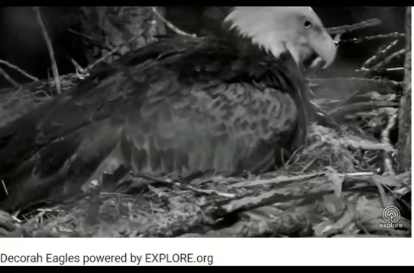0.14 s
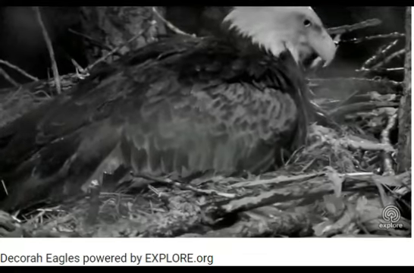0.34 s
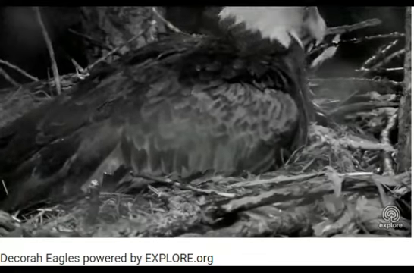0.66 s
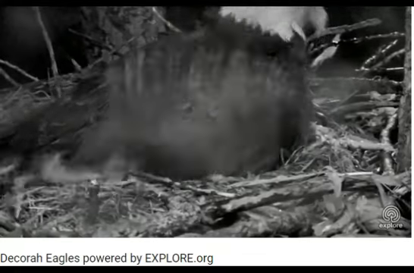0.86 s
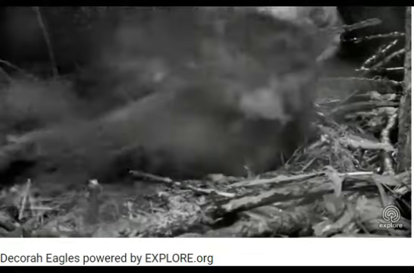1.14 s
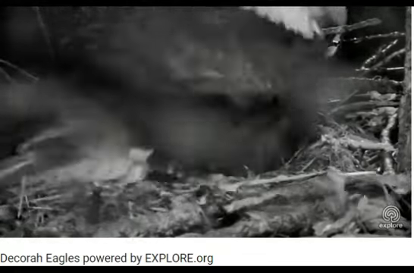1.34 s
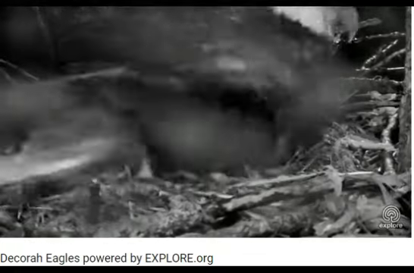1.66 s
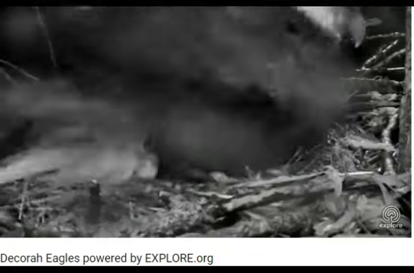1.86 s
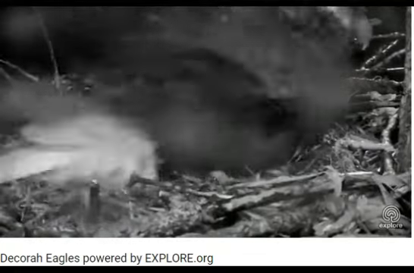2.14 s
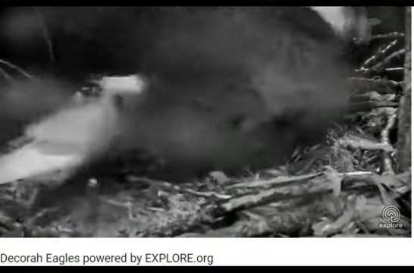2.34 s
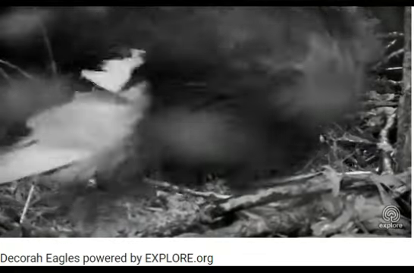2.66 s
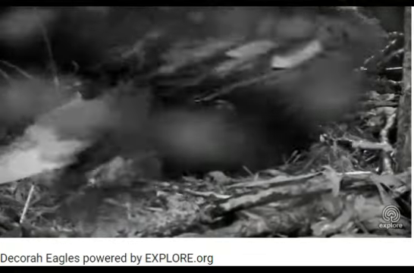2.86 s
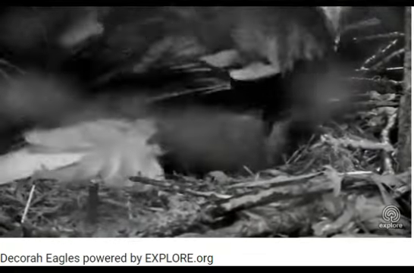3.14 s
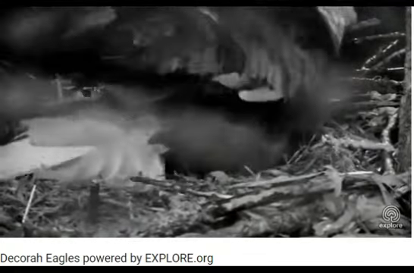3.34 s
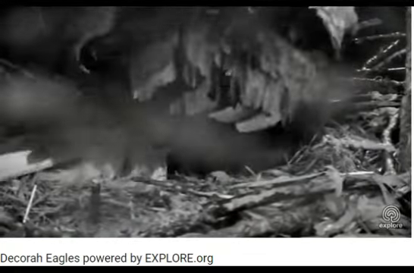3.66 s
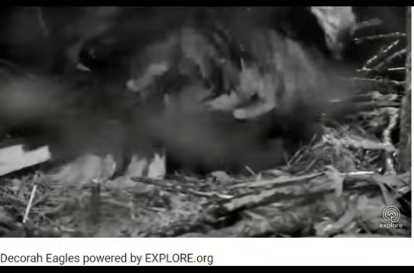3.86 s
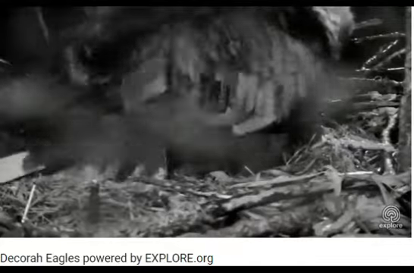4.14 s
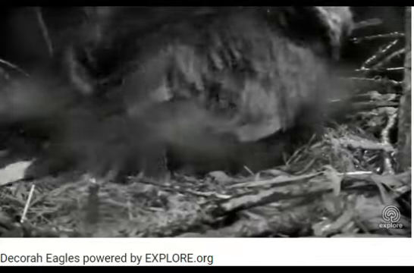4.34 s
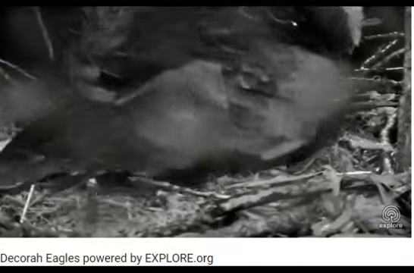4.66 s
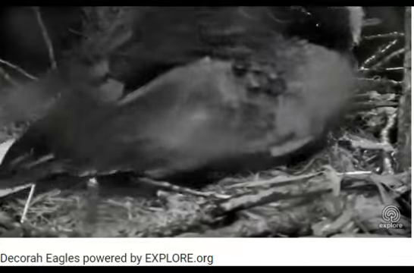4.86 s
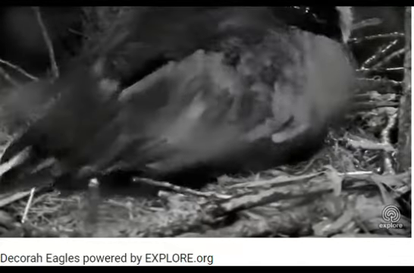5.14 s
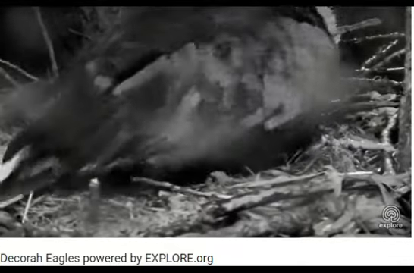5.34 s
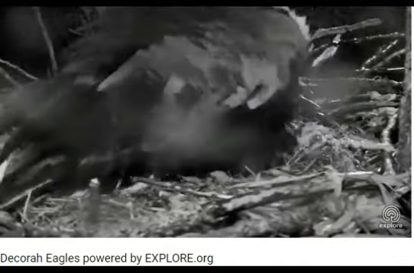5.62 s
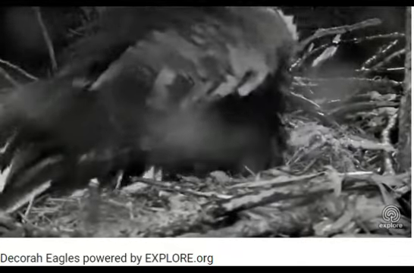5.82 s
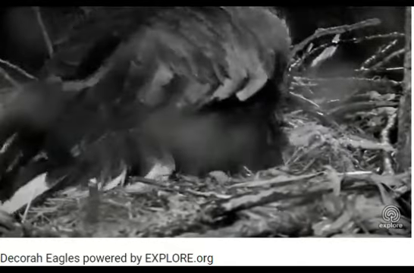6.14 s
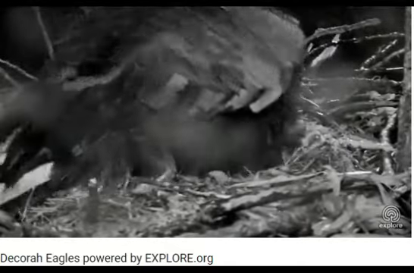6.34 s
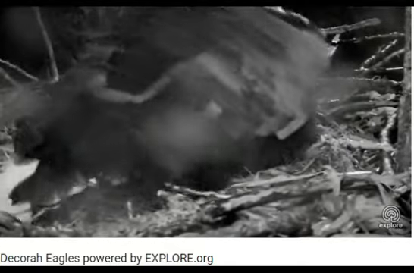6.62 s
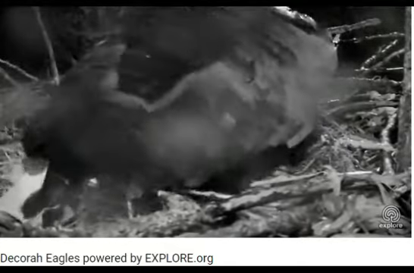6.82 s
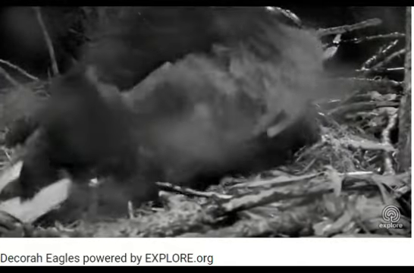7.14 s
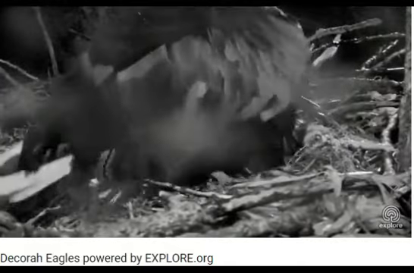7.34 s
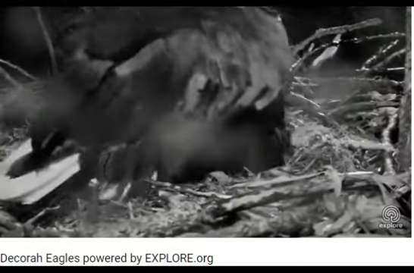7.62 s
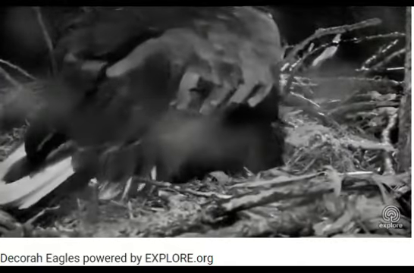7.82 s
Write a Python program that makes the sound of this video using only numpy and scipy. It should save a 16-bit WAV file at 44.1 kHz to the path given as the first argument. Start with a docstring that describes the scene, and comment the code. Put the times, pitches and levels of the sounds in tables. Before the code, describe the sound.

Rain hisses and patters throughout over a low, gently gusting wind, heard through a small outdoor microphone with a thin, telephone-like tone. Larger drops tap on its housing at about 0.5 seconds and just before 2 seconds. A distant songbird gives a few faint falling notes between 2 and 2.7 seconds. At about 2.8 seconds an eagle shakes out its feathers very close by: a rapid, fluttering swish with sharp, clattering quill clicks and dull wing thumps. This is much louder than the weather, with the hardest snap near 3.4 seconds. The shaking runs down and ends by 4.5 seconds. The rain and wind continue, slightly softer. From about 5.5 to 7.4 seconds the far songbird chirps and twitters faintly, and two more drops tap near the end.

```python
"""An eagle stands up on its stick nest and shakes out its feathers in steady rain and wind.
Its body twists about fourteen times a second: feathers rub and swish, stiff quills clatter and the wings
thump, right beside a small outdoor microphone. Raindrops tap on the microphone's housing, and a songbird
twitters far off. The sound is sampled at a telephone rate, which mirrors its treble upwards."""
import sys
import numpy as np
from scipy import signal
from scipy.fft import rfft, irfft
from scipy.io import wavfile
from scipy.ndimage import uniform_filter1d

SR = 44100
rng = np.random.default_rng(int(sys.argv[2]) if len(sys.argv) > 2 else 0)


def store_wav(level_fs):
    """Save 16-bit WAV to argv[1]."""
    pcm = np.round(np.clip(np.atleast_2d(level_fs), -1, 1) * 32767)
    wavfile.write(sys.argv[1], SR, pcm.T.astype(np.int16))


N = 352359

# how loud the weather is; the rain eases a little halfway through: t/s, rain level/dB, wind level/dB
WEATHER_LEVELS = [(0, -37.6, -42), (2.6, -38, -43), (4.0, -38, -42.5), (5.2, -39.5, -44),
                  (7.99, -40, -43.5)]
# how hard the eagle shakes; it starts quickly and slowly runs down: t/s, level/dB
SHAKE_EFFORT = [(2.72, -58), (2.85, -34.8), (3.05, -36), (3.2, -34.5), (3.5, -37), (3.85, -37),
                (4.08, -43.5), (4.16, -39), (4.45, -54)]


def gain_of(db):
    """Turns decibels into a number to multiply by."""
    return 10 ** (np.asarray(db) / 20)


def unit_level(x):
    """Scales a signal so that its average level (rms) is 1."""
    return x / np.sqrt(np.mean(x ** 2) + 1e-20)


def level_at(spectrum, hz):
    """Reads a spectrum's level at hz, with every octave equally wide."""
    known_hz, db = np.transpose(spectrum)
    return np.interp(np.log(hz + 1), np.log(known_hz + 1), db)


def follow(rows, t, column=1):
    """Reads one column of a table at the times t, along straight lines between the rows."""
    columns = np.transpose(rows)
    return np.interp(t, columns[0], columns[column])


def add(mix, start_s, sound):
    """Mixes a sound in at the given time."""
    part = mix[max(round(start_s * SR), 0):][:len(sound)]
    part += sound[:len(part)]


def colour(x, spectrum, size=2048):
    """Filters x with a spectrum; nothing rings ahead of a click, so clicks stay sharp."""
    hz = abs(np.fft.fftfreq(size, 1 / SR))
    log_gain = np.log(gain_of(np.maximum(level_at(spectrum, hz), -90)))
    taps = np.fft.ifft(np.exp(np.conj(signal.hilbert(log_gain)))).real
    return signal.oaconvolve(x, taps[:size // 2])[:N]


def ring(tones, tilt_db=0, stretch=1):
    """A ring made of a few dying tones; tilt_db brightens them, stretch raises their pitch."""
    t = np.arange(1024) / SR
    x = np.zeros(len(t))
    for hz, db, fade_s in tones:
        level = gain_of(db + tilt_db * np.log2(hz / 1000) - 60 * t / fade_s)
        x += level * np.sin(2 * np.pi * hz * stretch * t)
    return x / abs(x).max()


def clicks(per_s, spread_db):
    """Random clicks, mostly small and a few large."""
    size = gain_of(spread_db * np.minimum(rng.exponential(1, N), 4))
    return size * rng.choice([-1, 1], N) * (rng.random(N) < per_s / SR)


def rushing_air(low_hz, high_hz):
    """Steady noise between two frequencies."""
    band = signal.butter(2, [low_hz, high_hz], "band", fs=SR, output="sos")
    return unit_level(signal.sosfilt(band, rng.standard_normal(N)))


def wind_and_rain(patchy_db=1.16, gust_db=1.0, split_hz=750, size=1024):
    """Low gusty wind and the hiss of rain, each slowly changing in loudness."""
    # rain and wind, coloured by the microphone housing: f/Hz, level/dB
    weather_spectrum = [(12, -31), (20, -1), (44, -3.5), (86, -8), (174, -4), (232, -4.5), (368, -5.5),
                        (779, -12.5), (1040, -12.5), (1510, 2), (1610, 0), (1970, -10), (2300, -14.5),
                        (3060, -15), (3900, -23.5), (5070, -61), (8580, -120)]
    hop, hz = size // 4, np.fft.rfftfreq(size, 1 / SR)
    # noise is built on a grid of time (rows) and frequency (columns)
    real, imaginary, patches, gusts = rng.standard_normal((4, N // hop + 5, len(hz)))
    patches = uniform_filter1d(patches, size=10, axis=0)
    patches = unit_level(uniform_filter1d(patches, size=12, axis=1))
    gusts = unit_level(uniform_filter1d(gusts[:, :1], size=24, axis=0))
    db = level_at(weather_spectrum, hz) + patchy_db * patches - gust_db * gusts / (1 + (hz / 90) ** 2)
    grid = (real + 1j * imaginary) * gain_of(db)
    noise = signal.istft(grid.T, nperseg=size, noverlap=size - hop)[1][:N]
    spectrum, t = rfft(noise), np.arange(N) / SR
    wind_share = 1 / (1 + (np.fft.rfftfreq(N, 1 / SR) / split_hz) ** 4)
    wind = unit_level(irfft(spectrum * wind_share, N))
    rain = unit_level(irfft(spectrum * (1 - wind_share), N))
    return gain_of(follow(WEATHER_LEVELS, t, column=2)) * wind + gain_of(follow(WEATHER_LEVELS, t)) * rain


def raindrops(below_rain_db=7):
    """Nearby drops patter and make the housing ring; a few larger ones stand out."""
    # one drop heard through the housing: f/Hz, level/dB, time to fade by 60 dB/s
    housing_tones = [(1550, -5.5, 0.011), (2870, -16, 0.0033)]
    # larger drops close by: t/s, peak level/dB
    large_drops = [(0.508, -20), (.533, -25), (1.760, -23), (1.903, -23), (1.939, -24), (4.945, -26.5),
                   (7.705, -24), (7.930, -24)]
    tap = ring(housing_tones)
    patter = signal.oaconvolve(clicks(per_s=260, spread_db=2.5), tap)[:N]
    out = gain_of(follow(WEATHER_LEVELS, np.arange(N) / SR) - below_rain_db) * unit_level(patter)
    for start, db in large_drops:
        add(out, start, gain_of(db) * tap)
    return out


def bird_note(pitch, db, waver=0.013):
    """One soft-edged, slightly wavering whistle; pitch has rows of t/s, f/Hz."""
    length_s = pitch[-1][0]
    t = np.arange(0, length_s, 1 / SR)
    wobble = unit_level(uniform_filter1d(rng.standard_normal(SR // 4), size=40))[:len(t)]
    hz = follow(pitch, t) * (1 + waver * wobble)
    swell = np.sin(np.pi * (t / length_s) ** .8) ** 0.66
    return gain_of(db) * swell * np.sin(2 * np.pi * np.cumsum(hz) / SR)


def songbird(note_s=.045, fall_hz=360, twitter_per_s=16, echo_s=0.23, echo_db=-6):
    """A far songbird sings falling notes, calls, whistles and a faint twitter; the trees echo them."""
    # its usual short, husky note, sliding down: t/s, starting f/Hz, level/dB
    falling_notes = [(2.12, 2770, -42.5), (2.22, 2900, -47), (2.36, 2930, -46), (5.597, 2870, -44),
                     (5.715, 2890, -46), (6.085, 2870, -47), (6.155, 3150, -46.5), (6.996, 3130, -44)]
    # its sharp calls: t/s, level/dB
    sharp_calls = [(5.685, -44), (7.358, -41)]
    # a call sweeps up, then settles on one pitch: t/s from its start, f/Hz
    call_pitch = [(0, 2840), (.022, 4080), (.029, 3840), (.06, 3820)]
    # its thin, steady whistles: t/s, length/s, f/Hz, level/dB
    whistles = [(.14, 0.17, 3775, -51), (7.257, .075, 3980, -52.5)]
    # stretches of faint twittering: start t/s, end t/s
    twitter_spans = [(2.2, 2.7), (5.75, 7.0)]
    song = np.zeros(N)
    for start, hz, db in falling_notes:
        add(song, start, bird_note([(0, hz), (note_s, hz - fall_hz)], db, waver=0.021))
    for start, db in sharp_calls:
        add(song, start, bird_note(call_pitch, db))
    for start, length, hz, db in whistles:
        add(song, start, bird_note([(0, hz), (length, hz)], db, waver=0.0075))
    t = np.arange(SR // 2) / SR
    trees = rng.standard_normal(len(t)) * gain_of(-60 * t / echo_s)
    for start, end in twitter_spans:
        for beat in np.arange(start, end, 1 / twitter_per_s):
            first_hz, last_hz = 2944 + 280 * rng.uniform(-1.005, 1, 2)
            late_s = rng.random() / twitter_per_s
            add(song, beat + late_s, bird_note([(0, first_hz), (note_s, last_hz)], db=-52.5))
    echo = signal.oaconvolve(song, trees / np.linalg.norm(trees))[:N]
    return song + gain_of(echo_db) * echo


def shake_strength():
    """How hard the eagle shakes at each moment; zero before and after the shake."""
    t = np.arange(N) / SR
    shaking = (t > SHAKE_EFFORT[0][0]) & (t < SHAKE_EFFORT[-1][0])
    return gain_of(follow(SHAKE_EFFORT, t)) * shaking


def feathers(swish_db=7.5, way_back_db=-1.5, uneven_db=0.65, push_db=-12.5):
    """Feather strands slip over each other in tiny clicks; each twist adds a swish and a push of air."""
    # feathers rubbing: f/Hz, level/dB
    rubbing_spectrum = [(100, -23), (450, -14), (850, -11), (1200, -10), (1520, 8.5), (1800, -0.5),
                        (2250, -2), (2460, 1), (2700, -4), (2930, -0.5), (3250, -2), (3550, -2.5),
                        (3900, -12), (4500, -22.5)]
    first_twist_s, gap_s, slowing_s = 2.857, .0688, .00038  # each gap is slowing_s longer than the last
    effort, twists = shake_strength(), np.zeros(N)
    swell = signal.windows.gaussian(SR // 10, .010 * SR / np.sqrt(2))
    for k, chance in enumerate(rng.standard_normal(21)):
        middle_s = first_twist_s + k * (gap_s + slowing_s * k / 2)
        strength = gain_of(swish_db + way_back_db * (k % 2) + uneven_db * chance)
        add(twists, middle_s - .05, strength ** 2 * swell)  # the swell peaks .05 s in
    slips = unit_level(clicks(per_s=1700, spread_db=3.0))
    swish = colour(slips * effort * np.sqrt(1 + twists), rubbing_spectrum)
    swish /= np.std(colour(slips, rubbing_spectrum))
    push = rushing_air(low_hz=280, high_hz=850) * effort * np.sqrt(twists)
    return swish + gain_of(push_db) * push


def quill_click(tilt_db, stretch, contact_s=0.00014):
    """The click of a quill (a feather's stiff shaft), ringing in the microphone's housing and inlet."""
    # tones of the housing and its inlet tube: f/Hz, level/dB, time to fade by 60 dB/s
    housing_click_tones = [(520, -24, 0.0031), (1520, -5, 0.024), (2146, 0.5, 0.0061), (2525, 0.5, 0.0055),
                           (2920, 6, 0.0057), (3650, -2, 0.0027)]
    click = ring(housing_click_tones, tilt_db, stretch)
    t = np.arange(len(click)) / SR
    click *= 1 - np.exp(-(t / contact_s) ** 2)  # the contact takes a moment to build up
    return click / abs(click).max()


def small_quills(boost_db=10.5):
    """Smaller quills tick at random for as long as the eagle shakes."""
    hits = gain_of(boost_db) * shake_strength() * clicks(per_s=41, spread_db=1.5)
    return signal.oaconvolve(hits, quill_click(tilt_db=0, stretch=0.96))[:N]


def quill_snaps(detune=.02, bounces=3, gap_s=.0015, bounce_db=-9, fade_db_per_s=1500):
    """Quills snap against each other and against twigs, then chatter in quick, fading bounces."""
    # the loudest snaps: t/s, peak level/dB, brightness/(dB per octave)
    snaps = [(2.8989, -8.5, -10), (2.9091, -10.5, 0), (2.9236, -15, -2), (3.0060, -12, -8),
             (3.0717, -10.5, -9), (3.1023, -14, 0), (3.1333, -5.5, 6), (3.137, -1.5, 9), (3.1382, -1.5, 4),
             (3.197, -15, 0), (3.2721, -4, -2), (3.2854, -19, -2), (3.3505, -9, -5), (3.4135, -14, -8),
             (3.4246, 6, 3.5), (3.4780, -11.5, -14), (3.4854, -12, -12), (3.5730, -6, 4),
             (3.6917, -13.5, 1), (3.7068, -11.5, -1), (3.8715, -12.5, 4), (3.9962, -21, -12),
             (4.0080, -22, -15), (4.2178, -21.5, 3)]
    out = np.zeros(N)
    for start, db, tilt_db in snaps:
        snap = gain_of(db) * quill_click(tilt_db, stretch=1 + detune * rng.uniform(-1, 1))
        add(out, start, snap)
        delays = np.cumsum(gap_s * rng.uniform(.5, 1.5, bounces))
        signs = np.sign(rng.uniform(-1, 1, bounces))
        for delay, sign in zip(delays, signs):
            add(out, start + delay, sign * gain_of(bounce_db - fade_db_per_s * delay) * snap)
    return out


def wing_thumps(rise_s=.003):
    """The wings hit the body and squeeze out dull puffs of air."""
    # thumps on the hardest twists: t/s, level/dB
    thumps = [(3.003, -27), (3.134, -27), (3.272, -32), (3.348, -34), (3.424, -30), (3.483, -35.5),
              (3.571, -34.5)]
    t = np.arange(SR // 10) / SR
    puff = t / rise_s * np.exp(1 - t / rise_s)
    level = np.zeros(N)
    for start, db in thumps:
        add(level, start, gain_of(db) * puff)
    return level * rushing_air(low_hz=170, high_hz=1100)


def scene():
    """The weather, the shaking eagle and the far songbird, in one channel."""
    weather = wind_and_rain() + raindrops()
    eagle = feathers() + wing_thumps() + quill_snaps() + small_quills()
    return (weather + eagle + songbird())[None]


def record(dry, band_hz=3950, sampling_hz=8000, hiss_db=-69.5, ceiling=0.65, top_hz=16000):
    """Slow sampling mirrors the treble upwards; ticks and hiss join in, and loud peaks are cut flat."""
    # the converter's smoothing, which lets some mirrored treble through: f/Hz, level/dB
    smoothing = [(3200, 0), (4000, -6.5), (4500, -8.5), (5000, -12), (6000, -27.5), (7000, -48),
                 (9500, -45), (11000, -27.5), (13000, -30.5), (15000, -53)]
    # thin ticks: t/s, peak level/dB
    ticks = [(2.905, -21), (5.313, -32)]
    narrow = signal.sosfilt(signal.butter(10, band_hz, fs=SR, output="sos"), dry[0])
    phase = 2 * np.pi * sampling_hz * np.arange(N) / SR
    # copies appear on both sides of the sampling rate and of twice that rate
    mirrored = narrow * (1 + 2 * np.cos(phase) + 2 * np.cos(2 * phase))
    smooth = colour(mirrored, smoothing)
    for start, db in ticks:
        add(smooth, start, gain_of(db) * np.exp(-np.arange(20) / 2))
    hiss = gain_of(hiss_db) * rng.standard_normal(N)
    clipped = np.clip(smooth + hiss, -ceiling, ceiling)
    treble_cut = signal.firwin(127, top_hz, window=("kaiser", 9), fs=SR)
    return signal.oaconvolve(clipped, treble_cut, "same")[None]


dry = scene()
out = record(dry)
store_wav(out)
```